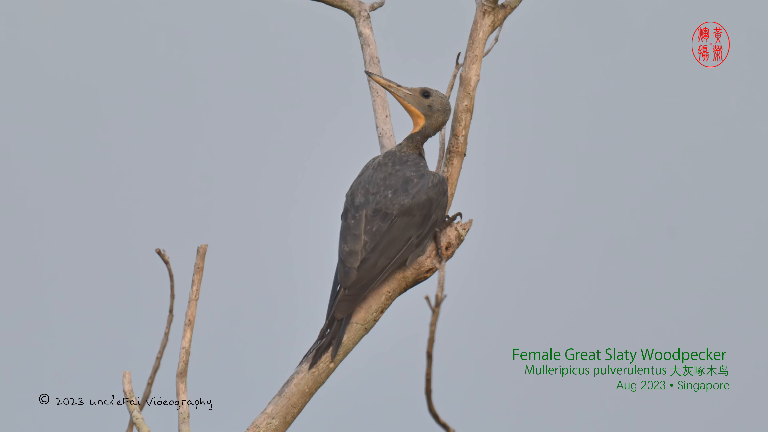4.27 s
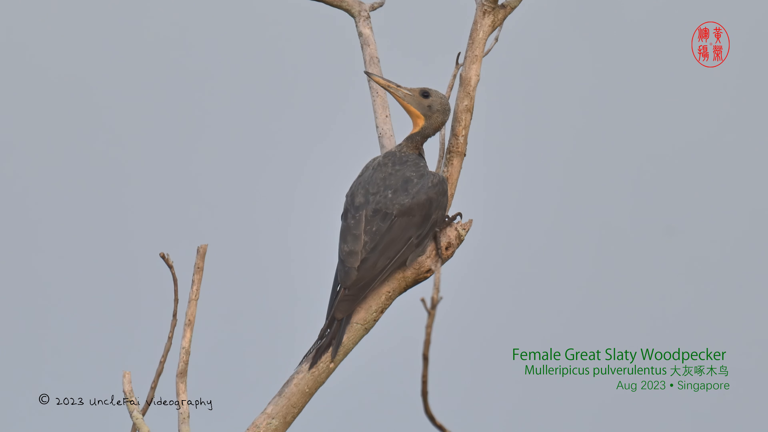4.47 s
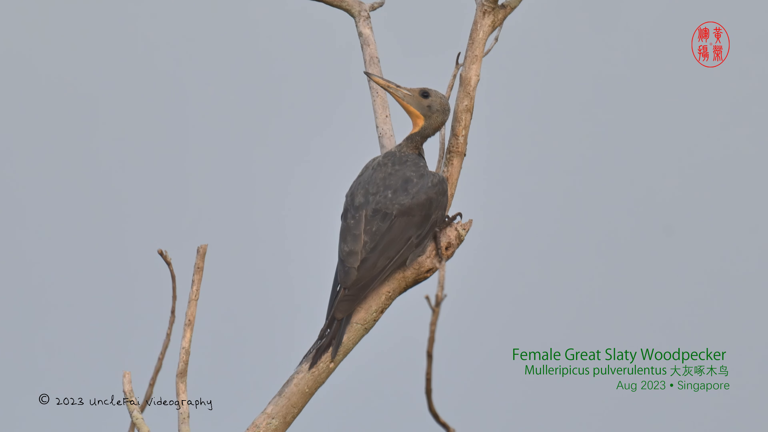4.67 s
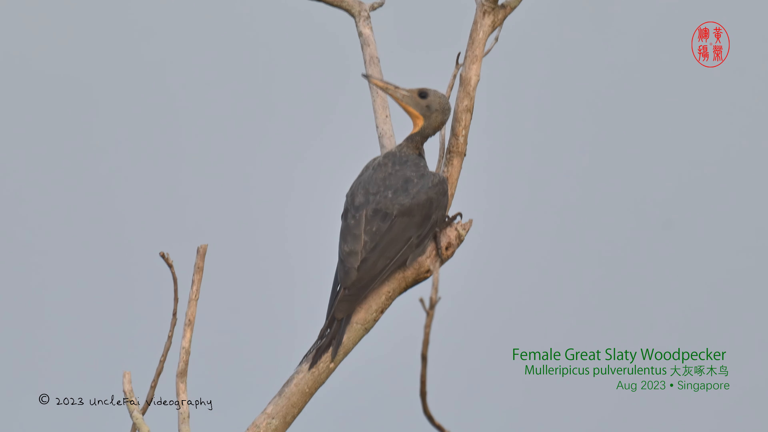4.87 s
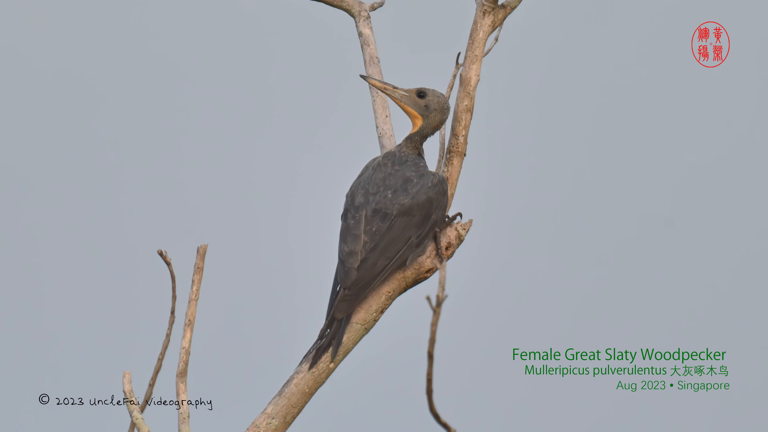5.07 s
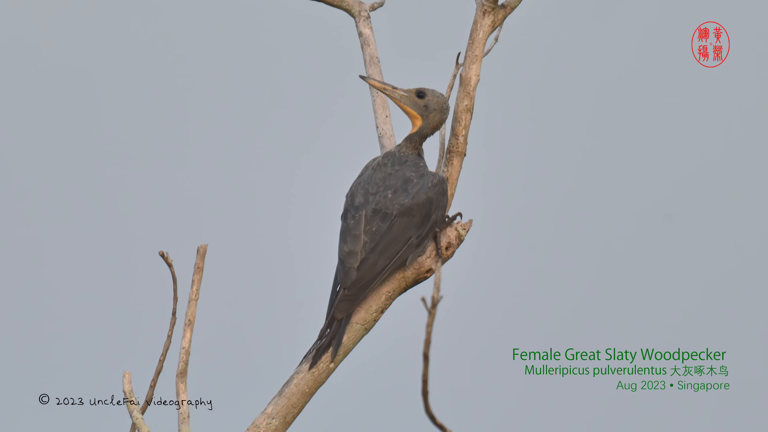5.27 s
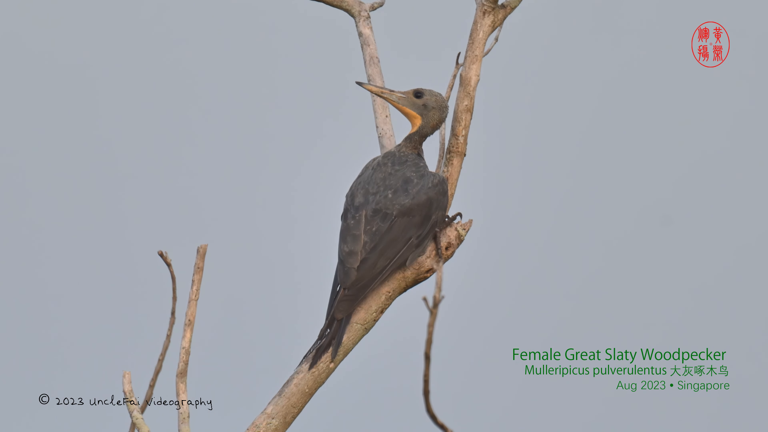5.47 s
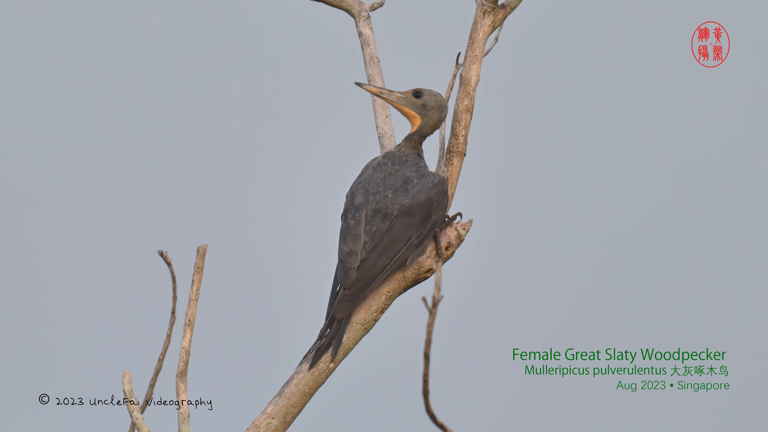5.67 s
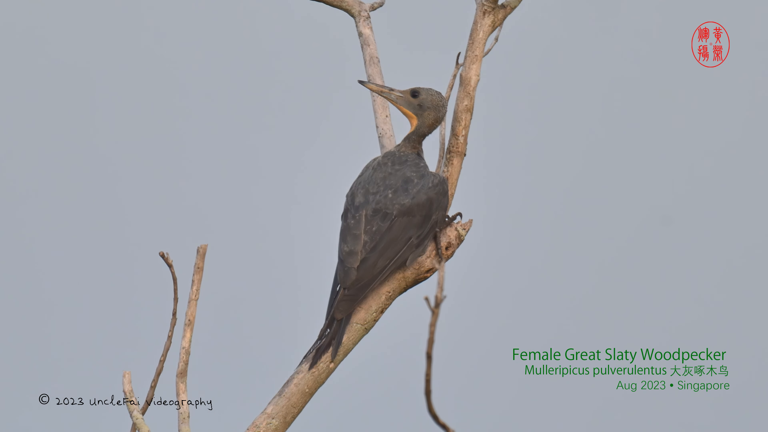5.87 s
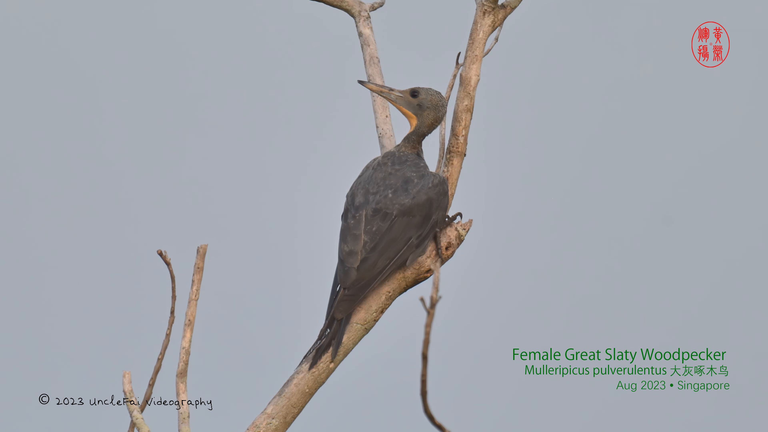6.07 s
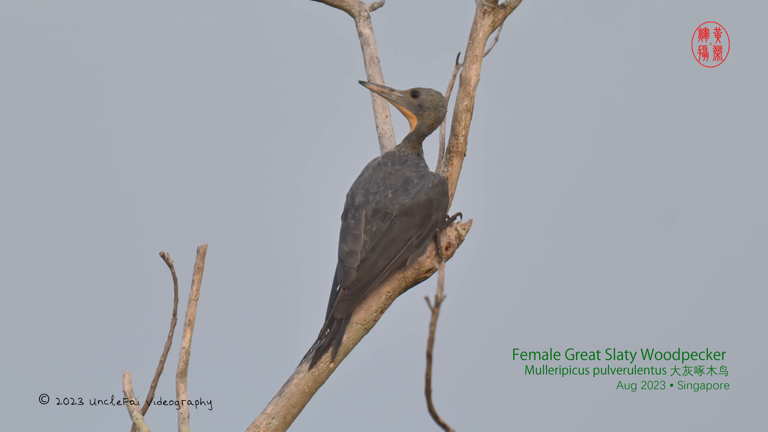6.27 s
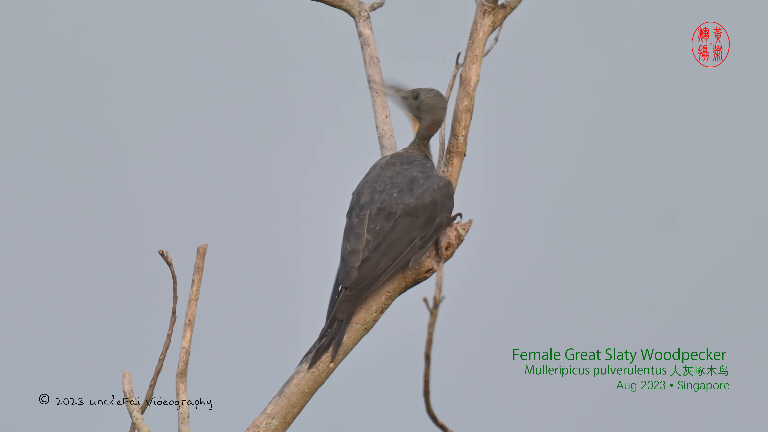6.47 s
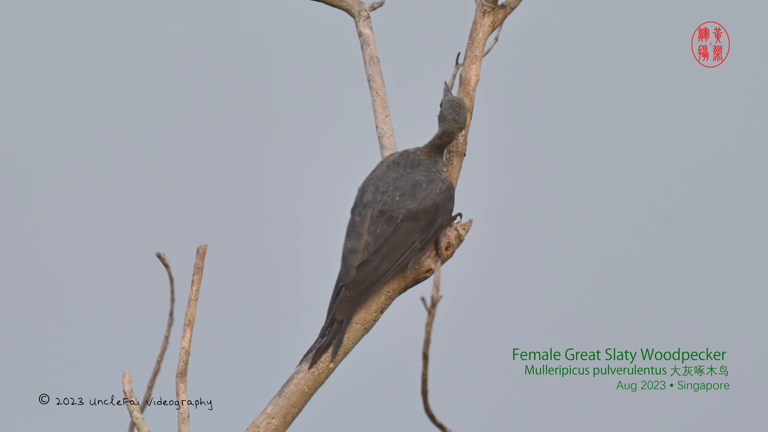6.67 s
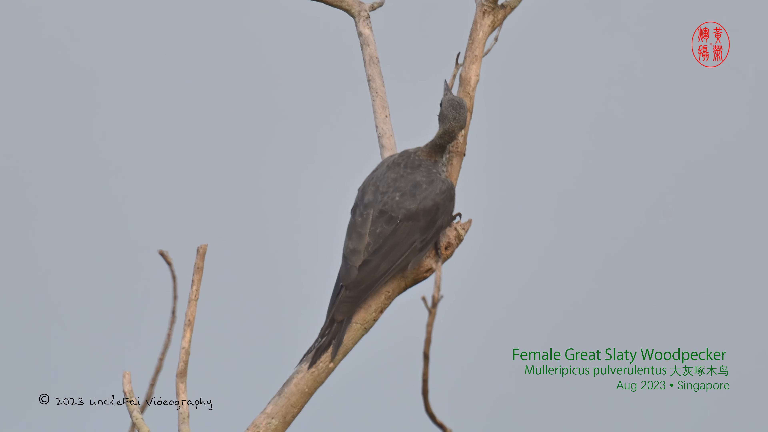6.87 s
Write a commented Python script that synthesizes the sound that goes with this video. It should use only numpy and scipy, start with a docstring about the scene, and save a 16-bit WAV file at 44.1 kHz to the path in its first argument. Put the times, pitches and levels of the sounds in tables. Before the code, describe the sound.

Throughout, several cicadas sustain a high, finely pulsed drone, with short katydid chirps on the left and swelling rasps on the right. Beneath are low distant traffic rumble and gently shifting leaf hiss. A hazy far call fades at the very start; a soft hollow knock lands near 0.9 s and faint snaps near 1.3 and 1.5. From about 1.95 to 2.35 s a woodpecker straight ahead calls four short, bright notes, each climbing fast and dropping, with a woodland echo; a dry snap and dull knock fall at 2.2. Faint far birds whistle at left: falling near 2.6, arched near 4.1, falling near 5.1. A snap comes at 3.6, a tiny hard tick at 4.17, a sharper snap with hollow knocks around 4.7. A soft leafy rustle swells at 5.3-5.9. The woodpecker's four-note run repeats from 6.55 until the end, just before 7 s.

```python
"""Cicadas drone, a katydid on each side rasps and far traffic rumbles under leaf hiss throughout.
Filtered noise makes them: pulsed bands, gated bands and a drifting spectrum. Soft noise bands come and go
(hazy far calls, a leaf rustle, a short blip, echoes), far birds whistle, dry noise snaps and hollow
two-tone knocks fall, and a tick rings. At two and again at about six and a half seconds a woodpecker,
a stack of gliding partials, calls four short arched notes, answered by the forest's echo."""
import sys
import numpy as np
from scipy import signal
from scipy.fft import rfft, irfft
from scipy.io import wavfile
from scipy.ndimage import uniform_filter1d

SR = 44100
rng = np.random.default_rng(int(sys.argv[2]) if len(sys.argv) > 2 else 0)


def file_out(sig):
    """Save sig as 16-bit WAV at sys.argv[1]."""
    # one column per channel
    cols = np.atleast_2d(sig).T
    # limit, then scale
    lim = np.clip(cols, -1, 1)
    pcm = np.round(lim * 32767).astype(np.int16)
    wavfile.write(sys.argv[1], SR, pcm)


N = 305172


def gain_of(db):
    """Logarithmic level: 20 dB is a factor of ten in amplitude."""
    return 10 ** (np.asarray(db) / 20)


def evened(x):
    """Power normalisation: scales to rms 1."""
    return x / np.sqrt(np.mean(x ** 2) + 1e-20)


def read(points, hz):
    """Spectral interpolation on a logarithmic frequency axis."""
    f, value = np.transpose(points)
    return np.interp(np.log(hz + 1), np.log(f + 1), value)


def add(mix, s, sound):
    """Superposition: mixes a sound in at time s; what falls before zero is cut."""
    at = round(s * SR)
    sound = sound[..., max(-at, 0):]
    part = mix[..., max(at, 0):][..., :sound.shape[-1]]
    part += sound[..., :part.shape[-1]]


def flutter(rms, samples, size):
    """Random modulation: noise smoothed twice, scaled to the given rms."""
    smooth = uniform_filter1d(rng.standard_normal(size), samples)
    return rms * evened(uniform_filter1d(smooth, samples))


def band(hz, width, size=N):
    """Resonance: white noise through the same resonant response twice."""
    f = np.fft.rfftfreq(size, 1 / SR)
    response = 1 / (1 + (2 * (f - hz) / width) ** 2)
    return evened(irfft(rfft(rng.standard_normal(size)) * response, size))


def leaned(pair, lean_db):
    """Interaural level difference: shares lean_db (left minus right) between two channels."""
    return pair * gain_of([[lean_db / 2], [-lean_db / 2]])


def placed(x, lean_db, right_delay):
    """Localisation by level and by arrival time (samples) at two microphone ports."""
    return leaned(np.array([x, np.roll(x, right_delay)]), lean_db)


def spread(hz, width, lean_db, same):
    """Partial coherence: echoes differ at each port, so only a share of the noise is alike."""
    left = band(hz, width)
    # The shared part reaches the right port six samples early
    right = same * np.roll(left, -6) + np.sqrt(1 - same ** 2) * band(hz, width)
    return leaned(np.array([left, right]), lean_db)


def forest(x, dull_hz, far_s=0.081, early_db=13):
    """Reverberation: near branches answer briefly at once; the far tree line sends a late, dull tail."""
    late_t60, early_t60 = 1.0, 0.23  # s
    t = np.arange(SR) / SR
    late = rng.standard_normal((2, SR)) * gain_of(-60 * t / late_t60)
    late *= 1 - np.exp(-(t / far_s) ** 4)
    late = signal.lfilter(*signal.butter(2, dull_hz, fs=SR), late + .5 * late[::-1])
    early = rng.standard_normal((2, SR)) * gain_of(-60 * t / early_t60) * (t > .002)
    tail = late / np.linalg.norm(late[0])
    tail += gain_of(early_db) * early / np.linalg.norm(early[0])
    return signal.fftconvolve(x[None], tail, axes=1)[:, :N]


def air():
    """Broadband ambience: random short-time spectra, patchy in time and pitch, give rumble and leaf hiss."""
    # Overall spectrum: frequency_hz, relative_level_db_per_hz
    colour_points = [(20, -19), (45, 1), (75, 1), (130, -3.5), (190, -15), (380, -13), (950, -20),
                     (1300, -25.5), (2500, -27.5), (3400, -29), (5500, -30), (8500, -55), (11500, -28.5),
                     (15800, -36.5)]
    # Coherence of the two ports: frequency_hz, likeness (-1 to 1)
    likeness_points = [(300, 1), (480, 0.98), (800, 0.9), (1300, 0.58), (2000, -0.059), (3300, -0.66),
                       (5500, -0.39), (15000, -0.083)]
    # Stereo balance: frequency_hz, left_minus_right_db
    balance_points = [(450, 0), (1200, -3), (3300, -1.5), (6000, -2.5), (12000, -9.5), (15000, -3.5)]
    # Leaf hiss, a moving broad peak: time_s, boost_db, centre_hz
    leaf_path = [(0, -1.5, 3700), (.9, 2.5, 3150), (1.05, -5.5, 3900), (1.3, -9, 3830), (1.36, 5, 4000),
                 (1.56, 6, 4000), (1.75, -8, 3700), (2.8, 1, 4000), (3.6, 2, 3660), (4.4, 3, 4360),
                 (5.2, -1, 4000), (5.9, 3.5, 4470), (6.92, -2, 4700)]
    level_db = -42.5  # rms over both ports

    frames, hz = N // 256 + 5, np.fft.rfftfreq(1024, 1 / SR)
    a, b, c, d, patches = rng.standard_normal((frames, 513, 5)).T
    patches = evened(uniform_filter1d(uniform_filter1d(patches, 30, 0), 20, 1))
    same = read(likeness_points, hz)[:, None]
    left = a + 1j * b
    right = same * left + np.sqrt(1 - same ** 2) * (c + 1j * d)
    spectra = np.array([left, right])
    # Patches reach full depth above 2500 Hz
    spectra *= gain_of(2.5 * patches * np.clip(hz / 2500, 0, 1)[:, None])

    s, leaf_db, centre_hz = np.transpose(leaf_path)
    t = np.arange(frames) * 256 / SR
    log_distance = np.log((hz[:, None] + 1) / np.interp(t, s, centre_hz))
    leaf_peak = np.exp(-(log_distance / .5) ** 2)
    spectra *= gain_of(leaf_peak * np.interp(t, s, leaf_db))
    noise = signal.istft(spectra, nperseg=1024, noverlap=768)[1][:, :N]

    f = np.fft.rfftfreq(N, 1 / SR)
    half_balance = np.array([[.5], [-.5]]) * read(balance_points, f)
    colour = gain_of(read(colour_points, f) + half_balance)
    return gain_of(level_db) * evened(irfft(rfft(noise) * colour, N))


def pulses(per_s, depth, t, wander):
    """Amplitude modulation: swells once a cycle, at a slightly wandering rate."""
    drift = evened(uniform_filter1d(rng.standard_normal(len(t)), 6000))
    turns = np.cumsum(per_s * (1 + wander * drift)) / SR
    return evened(1 + depth * np.cos(2 * np.pi * turns))


def cicadas():
    """Pulsed resonance: each singer buckles its drum in quick pulses and swells slowly."""
    # centre_hz, width_hz, level_db, pulses_per_s, pulse_depth (0-1), swell_period_s,
    # swell_peak_s, swell_db, left_minus_right_db
    singers = [(7036, 324, -40.5, 65, 0.06, 0.36, 0.18, 0.5, -0.5),
               (7380, 205, -40.5, 81, 0.35, 1.21, 0.58, 0, 4),
               (7658, 300, -38.5, 74, 0.23, 2.3, .8, 0.5, 0), (8060, 270, -47.5, 98, 0.4, 1.35, .2, 0.5, 3),
               (9610, 1030, -52, 86, 0.22, 1.083, 0.032, 2.5, 9),
               (9320, 1080, -48.5, 96, 0.34, 1.11, 0.66, 1, 3.5)]
    t, out = np.arange(N) / SR, np.zeros((2, N))
    for hz, width, db, per_s, depth, period, peak, swell_db, lean_db in singers:
        swell = gain_of(db + swell_db * np.cos(2 * np.pi * (t - peak) / period))
        out += swell * pulses(per_s, depth, t, 0.0388) * spread(hz, width, lean_db, 0.21)
    return out


def katydids():
    """Stridulation: noise gated by wing strokes, growing chirps at left, swelling rasps at right."""
    # Left singer: end_s (strokes finish 4 ms before it), wing_strokes
    chirp_rows = [(.035, 4), (.293, 3), (.617, 5), (.833, 3), (1.122, 4), (1.55, 3), (2.49, 4), (2.781, 4),
                  (2.999, 4), (3.255, 4), (3.466, 3), (3.724, 5), (3.953, 4), (4.279, 4), (4.52, 4),
                  (4.762, 5), (4.974, 4), (5.225, 4), (5.501, 4), (5.805, 3), (6.482, 5), (6.826, 4)]
    # Right singer: start_s, length_s, level_db
    rasp_rows = [(.177, 0.3, -54), (.481, .14, -55), (.726, .23, -56), (1.321, 0.32, -52.5),
                 (2.77, .155, -63), (2.9, .155, -57), (3.047, .167, -58), (3.179, .24, -58),
                 (3.486, 0.22, -52.5), (3.746, .264, -54), (4.26, 0.36, -50), (4.603, 0.28, -56),
                 (5.205, .2, -53), (5.755, 0.21, -54), (5.955, .28, -55), (6.629, 0.25, -52)]
    strokes_per_s, first_gain = 44, 0.69  # the gain ramps from first_gain to 1
    chirp_db = -51.5  # before that ramp and the wing's resonances
    chirps, rasps = np.zeros((2, N))
    for end, count in chirp_rows:
        u = np.arange(0, 1, strokes_per_s / count / SR)  # progress through the chirp
        strokes = evened(np.sin(np.pi * count * u) ** 2)
        strokes *= first_gain + (1 - first_gain) * u
        add(chirps, end - count / strokes_per_s - .004, gain_of(chirp_db) * strokes)
    for s, length, db in rasp_rows:
        add(rasps, s, gain_of(db) * np.hanning(round(length * SR)) ** 0.46)
    left_wing = spread(10930, 1700, 6.4, 0.25) + 0.36 * spread(14800, 2600, 5.8, 0.27)
    right_wing = spread(11100, 3100, -11.5, 0.3)
    return chirps * left_wing + rasps * right_wing


def struck_envelope(t, t60):
    """Exponential decay after a quick rise."""
    return (1 - np.exp(-t / .0025)) * gain_of(-60 * t / t60)


def snaps():
    """Impulsive noise: a crack band and a higher hiss band rise quickly and die away together."""
    # start_s, hiss_db, crack_db, t60_s, left_minus_right_db
    snap_rows = [(1.266, -47, -70, 0.059, -11), (1.516, -47.5, -56, 0.08, -25), (1.972, -43, -58, .05, 1.5),
                 (2.191, -31, -51, 0.066, -13), (3.610, -37, -44, 0.059, -6), (4.164, -47, -39, 0.031, -1),
                 (4.662, -28, -42.5, 0.055, -13), (4.687, -45, -49, 0.15, -6)]
    out, size = np.zeros((2, N)), 8192
    t = np.arange(size) / SR
    for s, hiss_db, crack_db, t60, lean_db in snap_rows:
        hiss = gain_of(hiss_db) * band(11400, 2400, size)
        crack = gain_of(crack_db) * band(5300, 4500, size)
        add(out, s, placed(struck_envelope(t, t60) * (hiss + crack), lean_db, 0))
    return out


def knocks():
    """Damped modes: small hollow knocks ring briefly on two tones with a puff of noise."""
    # start_s, lower_tone_hz, lower_tone_level_db (before the rise and decay), t60_s
    knock_rows = [(.873, 800, -37, .06), (1.516, 2700, -47, .06), (1.602, 1070, -43.5, .12),
                  (2.191, 420, -29.5, .04), (4.663, 750, -36, .035), (4.687, 1000, -37, .03),
                  (4.822, 620, -40, .1)]
    out, size = np.zeros((2, N)), 8192
    t = np.arange(size) / SR
    for s, hz, db, t60 in knock_rows:
        tones = np.sin(2 * np.pi * hz * t) + 0.35 * np.sin(2 * np.pi * 1.45 * hz * t)
        puff = .55 * band(1.3 * hz, hz, size)
        knock = gain_of(db) * struck_envelope(t, t60) * (tones + puff)
        add(out, s, np.tile(knock, (2, 1)))
    return out


def tick():
    """Modal ringing: something small and hard close by on the right is struck once, damped in a few cycles."""
    # start_s, right_level_db (before the modes' own levels), left_minus_right_db
    s, right_db, lean_db = (4.1656, -20, -7)
    # frequency_hz, relative_level_db, t60_s
    ringing_modes = [(8000, 0, .005), (5900, -2, .006), (3900, -11, .006), (2700, -17, .007)]
    out, t = np.zeros((2, N)), np.arange(1024) / SR
    ring = sum(gain_of(db - 60 * t / t60) * np.sin(2 * np.pi * hz * t) for hz, db, t60 in ringing_modes)
    add(out, s, placed(gain_of(right_db + lean_db / 2) * ring, lean_db, 0))
    return out


def soft_bands():
    """Band-limited noise under smooth windows: hazy far calls, a leaf rustle, a short blip and echoes."""
    # start_s, length_s, level_db, centre_hz, width_hz
    band_rows = [(-.15, 0.49, -54.5, 1670, 600), (2.35, .14, -56, 1790, 200), (2.42, .2, -59, 1760, 250),
                 (3.55, .13, -57, 1650, 450), (4.015, .04, -56, 1780, 120), (5.33, 0.6, -51.5, 1680, 800),
                 (5.52, 0.22, -57, 1750, 90)]
    out = np.zeros((2, N))
    for s, length, db, hz, width in band_rows:
        size = round(length * SR)
        swell = np.hanning(size) * spread(hz, width, -2.3, 0.99)[:, :size]
        add(out, s, gain_of(db) * swell)
    return out


def whistle(hz, level_db, octave=0):
    """Scintillation: pitch wavers and each partial flutters on its long path through leaves."""
    phase = 2 * np.pi * np.cumsum(hz * (1 + flutter(.004, 150, len(hz)))) / SR
    low, high = (gain_of(flutter(db, 300, len(hz))) for db in (1.6, 2.4))
    tone = low * np.sin(phase) + octave * high * np.sin(2 * phase)
    return np.sqrt(2) * gain_of(level_db) * tone * signal.windows.tukey(len(hz), .15)


def falling(landing_s, land_hz, db, loudest_s):
    """Frequency glide: slides down steadily, eases onto a low note, and swells then fades."""
    fall_s, linger_s = .125, .055
    swell_db_per_s, fade_db_per_s = 190, 30
    fall_hz_per_s, settle_hz = 11000, 150
    t = np.arange(-fall_s, linger_s, 1 / SR)
    hz = land_hz + settle_hz * np.logaddexp(0, -fall_hz_per_s * t / settle_hz)
    u = t - loudest_s
    swell_db = np.minimum(swell_db_per_s * u, -fade_db_per_s * u)
    return landing_s - fall_s, whistle(hz, db + swell_db)


def arched():
    """Two-partial glide: climbs fast, sags slowly and drops at the end; its octave is the louder."""
    # time_s, fundamental_hz, fundamental_level_db, octave_above_fundamental_db
    arch_path = [(3.99, 1340, -69, 9), (4.01, 1400, -65, 7), (4.04, 1482, -61, 8), (4.08, 1495, -62, 1),
                 (4.11, 1512, -59, 9), (4.21, 1480, -62, 10), (4.245, 1455, -68, 9), (4.275, 1390, -70, 14),
                 (4.315, 1300, -72, 13)]
    s, hz, db, octave_db = np.transpose(arch_path)
    t = np.arange(s[0], s[-1], 1 / SR)
    octave = gain_of(np.interp(t, s, octave_db))
    return s[0], whistle(np.interp(t, s, hz), np.interp(t, s, db), octave)


def far_whistlers():
    """Direct and reverberant sound: far whistles to the left trail the forest's echoes."""
    # Falling whistles: landing_s, landing_hz, level_db, loudest_s (from landing)
    fall_rows = [(2.670, 1380, -56.5, -.02), (5.156, 1415, -54, .012)]
    far = np.zeros(N)
    for row in fall_rows:
        add(far, *falling(*row))
    add(far, *arched())
    tail = forest(gain_of(-13) * far, dull_hz=3630, far_s=0.11, early_db=5)
    return placed(far, 11.0, 7) + tail


def note_pitch(t, opening_start, top_hz, opening_hz, hook_hz, catch_hz):
    """Frequency modulation: drops into an opening pitch, climbs with a catch, rounds over and drops."""
    climb_hz_per_s, climb_round_s = 25000, .006
    drop_hz_per_s, drop_round_s = 43000, .0096
    catch_depth_hz, catch_width_hz, ease_hz = 150, 90, 60
    hook_s = .005  # time constant of the first drop
    climb = top_hz - climb_hz_per_s * (np.hypot(t, climb_round_s) - climb_round_s)
    climb = climb - catch_depth_hz * np.exp(-((climb - catch_hz) / catch_width_hz) ** 2)
    hook = np.exp(-(t - opening_start) / hook_s - 1).clip(0, 1)
    opening = opening_hz + hook_hz * hook
    # A soft maximum eases the opening into the climb
    climb = ease_hz * np.logaddexp(climb / ease_hz, opening / ease_hz)
    drop = top_hz - drop_hz_per_s * (np.hypot(t, drop_round_s) - drop_round_s)
    return np.where(t < 0, climb, drop)


def note(top_s, top_hz, opening_hz, hook_hz, catch_hz, effort_db, soft_db, bright_db):
    """Source and filter: the throat lifts or hides each gliding partial; upper ones flicker more."""
    # Voice organ: relative_level_db of the first four partials
    source_db = [-0.5, -5, -9.5, -15]
    # Throat response: frequency_hz, level_db
    throat_points = [(1050, -28), (1230, -16), (1430, -3.5), (2080, -6), (2290, -15.5), (3000, -19),
                     (3400, -13), (4250, -7), (4700, -1), (5600, -3), (6300, -15), (8000, -22)]
    # Loss of each partial by the note's end as the bill closes: change_db
    bill_db = [-4, -6, -1, -12]
    # Effort through the note: time_from_top_s, level_db
    effort_points = [(-.06, -41), (-.051, -5.5), (-.008, -1.5), (.008, -6), (0.023, -11), (0.032, -4)]
    thin_hz, thin_db_per_hz = 1540, .05  # below this pitch the overtones are thin
    swell_in_s, flicker_db = .018, 1.2  # flicker rms is per partial number

    s, shape_db = np.transpose(effort_points)
    t = np.arange(s[0], s[-1], 1 / SR)
    hz = note_pitch(t, s[1], top_hz, opening_hz, hook_hz, catch_hz)
    phase = 2 * np.pi * np.cumsum(hz) / SR
    closing = np.linspace(0, 1, len(hz))
    thin_db = -thin_db_per_hz * np.maximum(thin_hz - hz, 0)
    opening_db = soft_db * np.exp(-((t - s[1]) / swell_in_s) ** 2)
    stack = np.zeros(len(hz))
    for k, (db, lost_db) in enumerate(zip(source_db, bill_db), 1):
        partial_db = db + read(throat_points, k * hz) + closing * lost_db
        if k > 1:
            partial_db += thin_db * 2 / k + bright_db
        if k < 3:
            partial_db += opening_db
        partial_db += flutter(flicker_db * k, 150, len(hz))
        stack += gain_of(partial_db) * np.sin(k * phase)
    effort = gain_of(effort_db + np.interp(t, s, shape_db))
    return top_s + s[0], np.sqrt(2) * effort * stack * signal.windows.tukey(len(hz), .1)


def woodpecker():
    """Direct and reverberant sound: two runs of notes almost straight ahead, with the forest's tail."""
    # top_s, top_hz, opening_hz, first_drop_hz (into the opening), climb_catch_hz, effort_db,
    # opening_change_db (two low partials), overtones_change_db
    note_rows = [(1.997, 2245, 1568, 142, 1480, -31, -10, 0.5), (2.097, 2247, 1060, 0, 1554, -27, 1, 1.5),
                 (2.203, 2155, 1050, -1, 1590, -27, -2, -0.5), (2.328, 2030, 1050, 5, 1590, -27, 1, -1),
                 (6.613, 2290, 1543, 104, 1450, -30.5, -10, -0.5),
                 (6.715, 2265, 1057, -6, 1920, -29, -0.5, 3), (6.822, 2044, 1093, 0, 1590, -30, 1, 6.5),
                 (6.942, 2014, 1054, 4, 1580, -30, 3, 8)]
    near = np.zeros(N)
    for row in note_rows:
        add(near, *note(*row))
    return placed(near, -0.31, 0) + forest(gain_of(-20.5) * near, dull_hz=1900)


def scene():
    """Superposition of all sources at the stereo microphone."""
    background = air() + cicadas() + katydids()
    events = snaps() + knocks() + tick() + soft_bands()
    return background + events + far_whistlers() + woodpecker()


def record(dry):
    """Band limitation: a linear-phase low-pass at the microphone's upper edge."""
    edge_hz = 15760
    low_pass = signal.firwin(1023, edge_hz, window=("kaiser", 9), fs=SR)
    return signal.oaconvolve(dry, low_pass[None], "same")


dry = scene()
out = record(dry)
file_out(out)
```